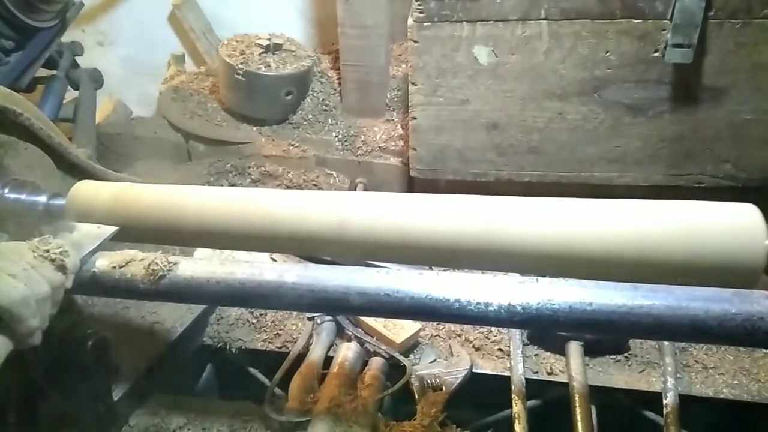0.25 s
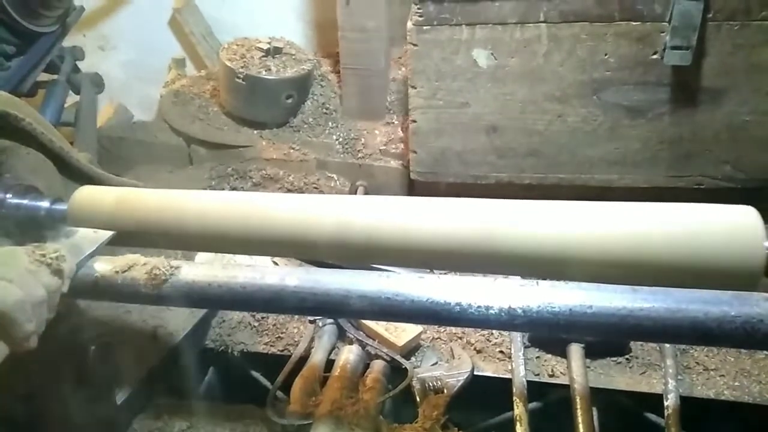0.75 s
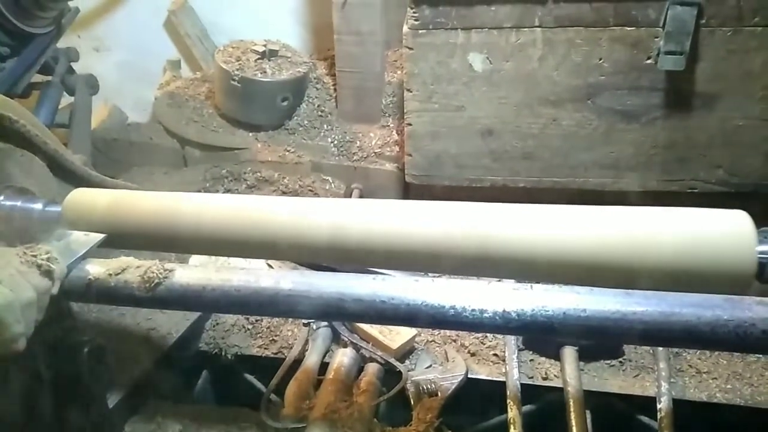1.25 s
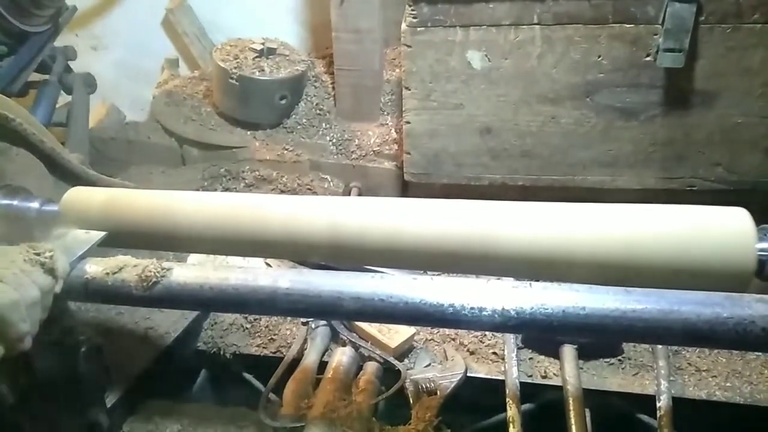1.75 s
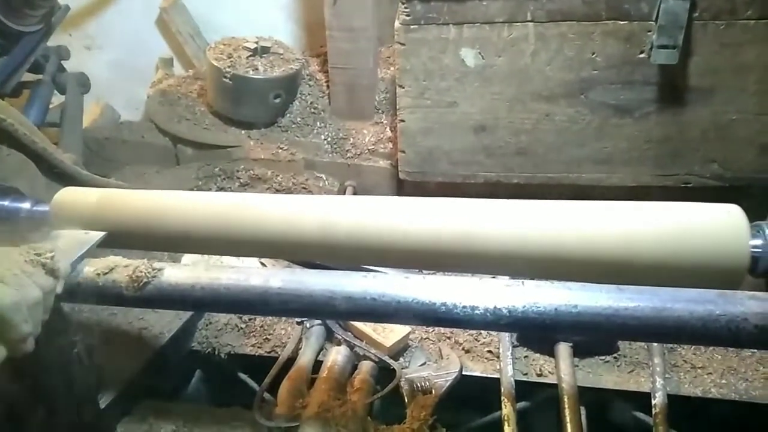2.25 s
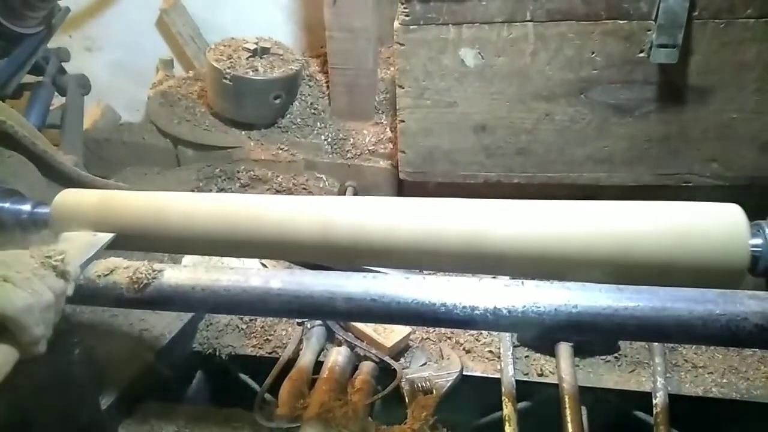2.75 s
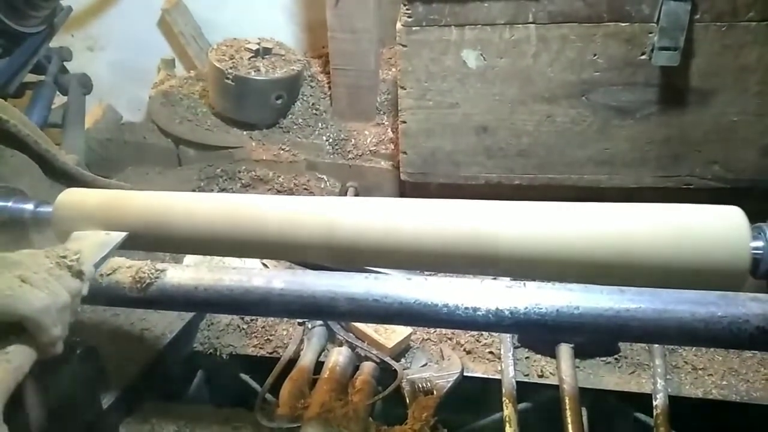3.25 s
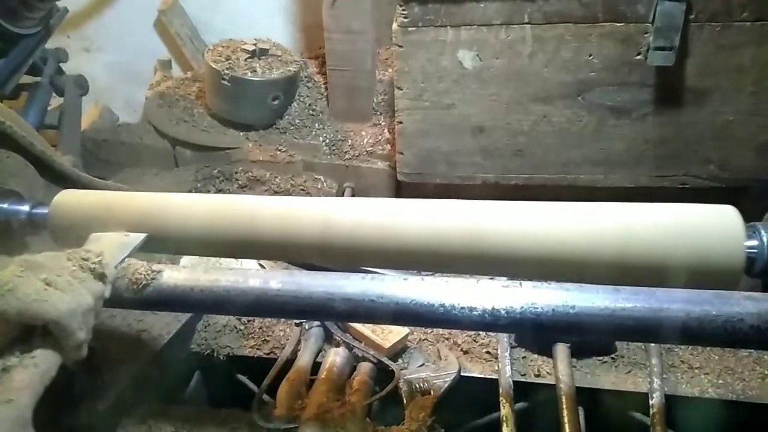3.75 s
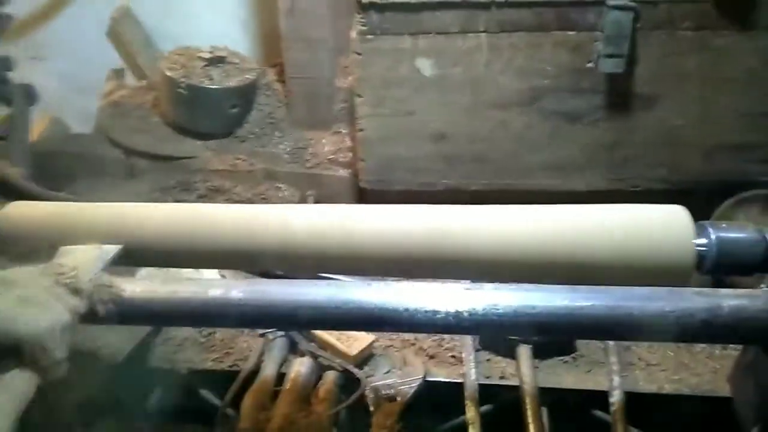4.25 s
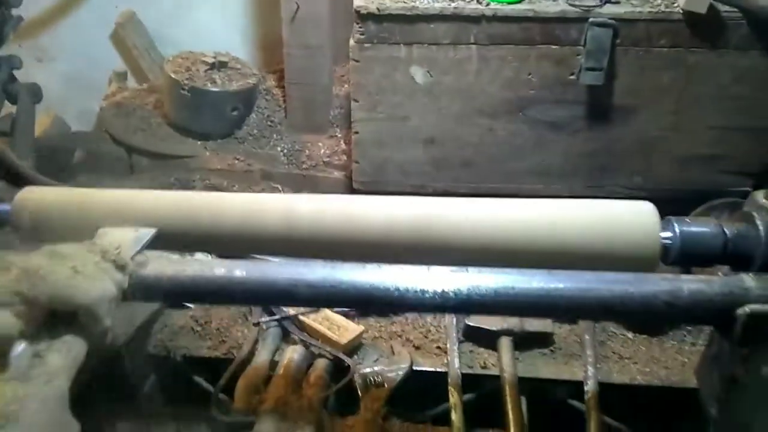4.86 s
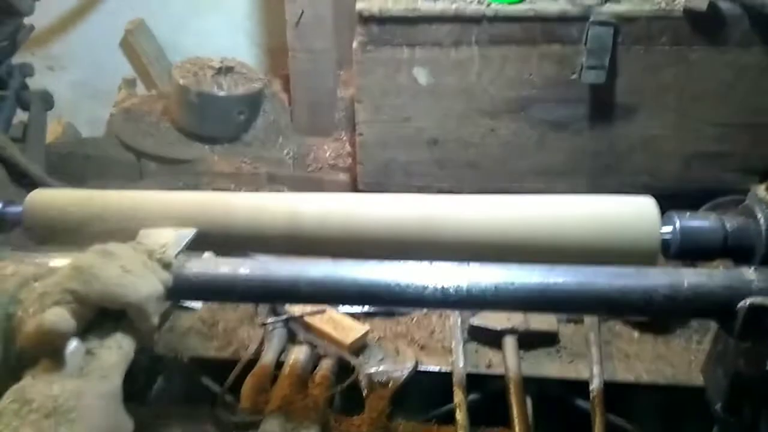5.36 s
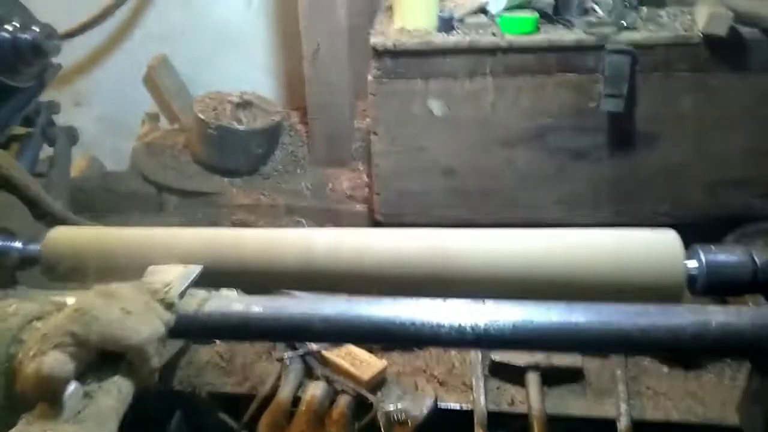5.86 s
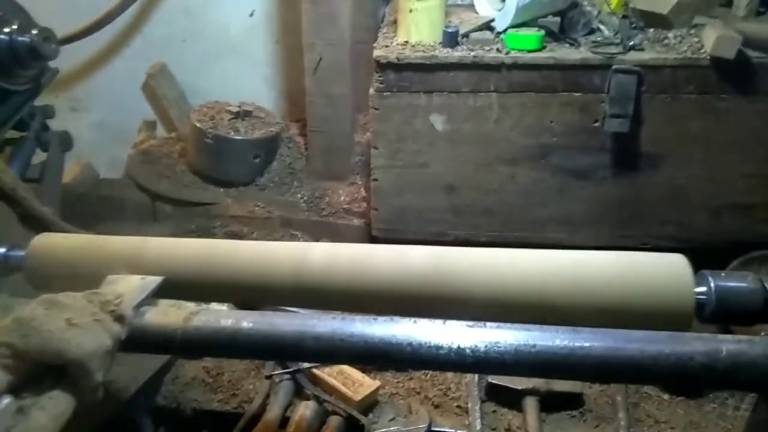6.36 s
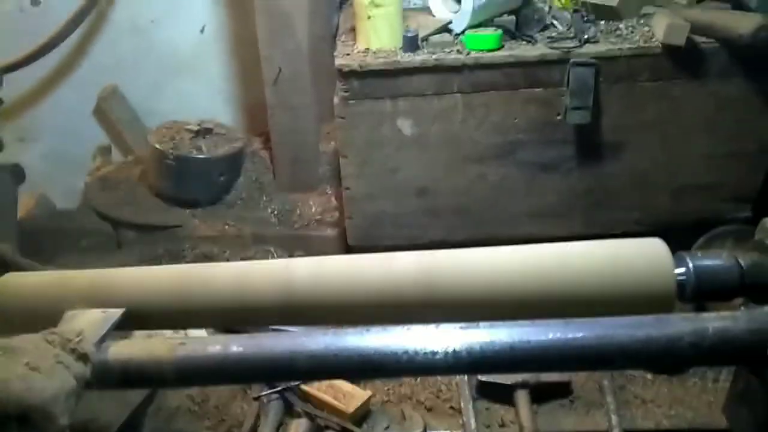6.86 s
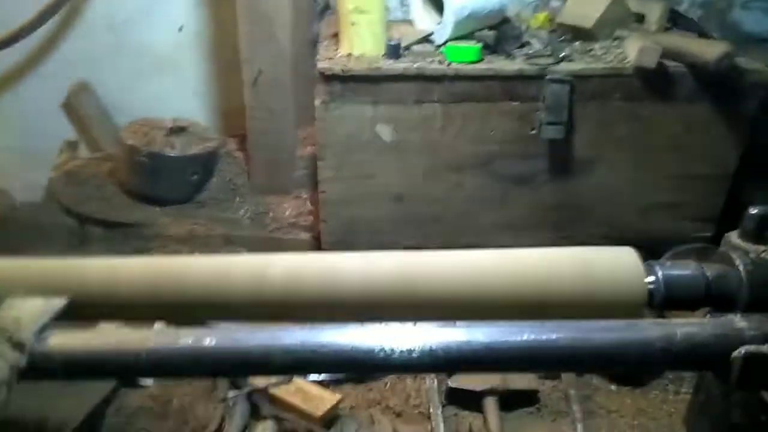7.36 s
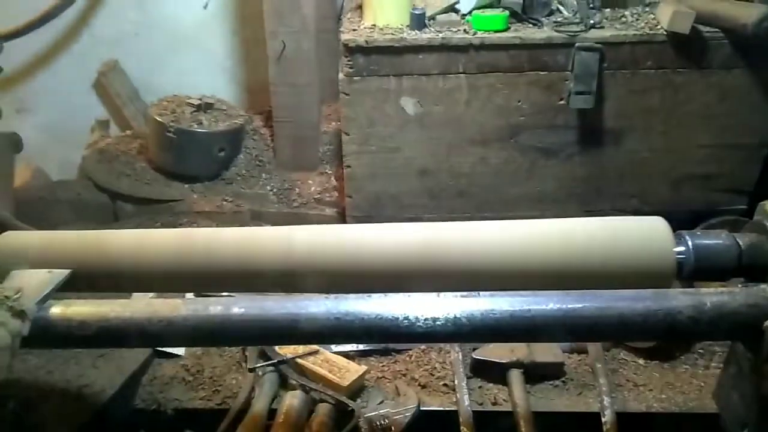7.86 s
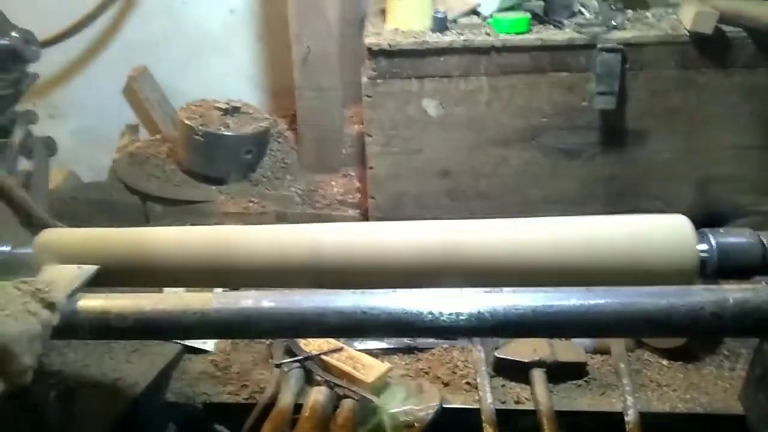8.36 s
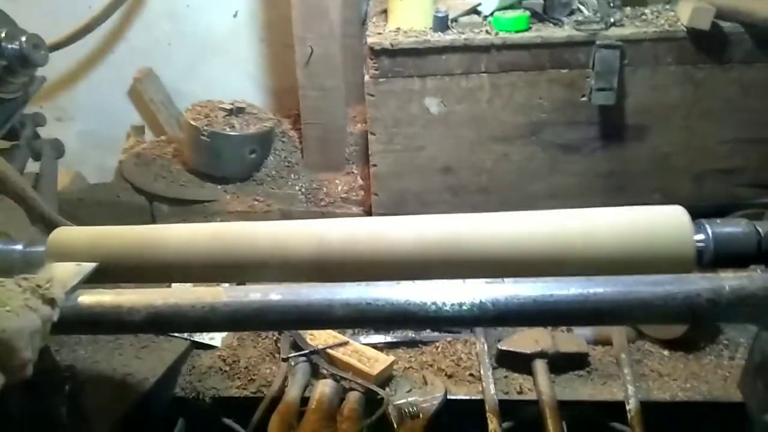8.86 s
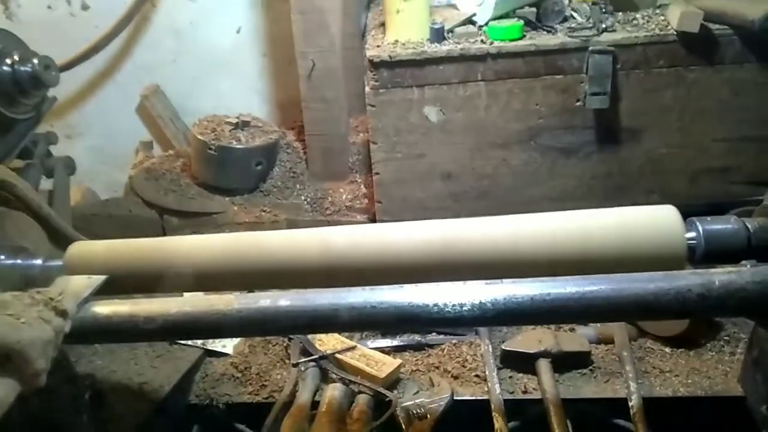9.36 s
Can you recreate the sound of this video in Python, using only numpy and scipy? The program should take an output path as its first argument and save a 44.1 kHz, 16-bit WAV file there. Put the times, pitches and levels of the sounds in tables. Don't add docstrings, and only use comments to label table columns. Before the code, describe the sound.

Close workshop scraping: a fast-turning wood cylinder rattles and rings against a cutting edge, with bright shaving hiss, thin squeals and low machine hum.

```python
import sys
import numpy as np
from scipy import signal
from scipy.io import wavfile
from scipy.ndimage import uniform_filter1d, map_coordinates

SR = 44100
rng = np.random.default_rng(int(sys.argv[2]) if len(sys.argv) > 2 else 0)


def how_loud(loudness_db):
    steps = np.asarray(loudness_db, float) / 20
    return 10 ** steps


def waveform_to_disk(signal):
    frames = np.transpose(np.atleast_2d(signal))
    scaled = np.clip(frames, -1, 1) * 32767
    samples = np.round(scaled).astype(np.int16)
    wavfile.write(sys.argv[1], SR, samples)


N = 423360
CONTROL_STEP = 40

# (frequency [Hz], width [Hz], level [dB])
REST_MODES = [(166.7, 4.9, -9), (186.6, 4.2, 0), (334.6, 52, -14.5), (452.3, 41.7, -1), (708.6, 8.3, -2.5),
              (931, 23.5, -1.5), (1076, 25, -4), (1206, 23, -1.5)]
# (frequency [Hz], density [dB per Hz])
REST_NOISE = [(15, -51), (25, -36), (76, -23.5), (172, -9), (277, -19.5), (456, -21), (562, -25),
              (707, -6.5), (1380, -7), (1700, -6), (2400, -10.5), (3120, -58), (5280, -120)]
# (frequency [Hz], width [Hz], level [dB])
MOTOR_LINES = [(718, 4, 0), (161, 5, -7), (900, 8, -9)]
# (time [s], frequency [Hz], level [dB])
HUM = [
    (6.3, 128, -93),
    (6.55, 128, -62.5),
    (7.3, 129, -60),
    (7.55, 129, -74),
]
# (middle [s], half length [s], peak [dB])
SHAKES = [
    (.06, 0.097, -57),
    (.65, 0.4, -64),
    (1.27, 0.16, -58),
    (1.63, .05, -58),
    (2.06, .04, -63),
    (5.9, 0.95, -67),
    (8.3, 0.54, -66),
]
# (time [s], peak [dB])
THUMPS = [
    (1.187, -37),
    (1.302, -37.5),
    (1.359, -60),
    (1.641, -39),
    (2.049, -40),
]
MOTOR_DB, REST_DB, SHAKE_REST_DB = -62, -56.5, -75
LEAN_DB = 10

# (time [s], depth of shaving [dB], lean on the rest [0-1], slackness of grip on the steel [dB])
HANDS = [(0, -3, 0.33, 1), (.65, 1, 0.3, 10), (1.1, 0.5, 0.18, 1), (1.45, 0, 0.1, -5), (1.95, -6, 0.1, 4),
         (2.25, -3, 0.42, 1), (2.55, 3, 0.48, 2), (2.95, 0.5, 0.64, 10), (3.4, 2, 0.59, 4.5),
         (4.5, -1.5, 0.76, 6.5), (5.25, 0, 0.88, 3), (5.6, -2.5, .8, 3.5), (6.3, 1.5, 0.94, -0.5),
         (6.75, -1, 0.64, -1), (7.85, 1, 0.78, -11), (8.35, -0.5, 0.68, -0.5), (8.7, -3.5, 0.18, -4.5),
         (9.6, -2, 0.09, -7)]
# (middle [s], half length [s], loss [dB])
EASES = [(0.284, 0.067, 2.5), (1.125, 0.019, 2.5), (1.482, 0.049, 4), (1.842, 0.024, 8), (3.665, 0.011, 7),
         (5.446, 0.04, 8), (5.717, 0.064, 2), (6.662, .02, 6.5), (6.772, 0.016, 7), (7.458, 0.014, 8),
         (7.534, 0.036, 8.5), (8.45, 0.042, 4), (8.735, 0.034, 9), (8.977, 0.065, 5.5), (9.22, 0.088, 5)]
TURNS_PER_S = 39.42
# (time [s], high spot angle [turns], knock share [0-1], surface memory [0-1], unevenness [dB])
CUT = [(0, -0.41, 0.8, 0.77, 1.5), (.6, -0.3, 0.94, 0.64, 1.5), (1.5, -.15, 1, 0.54, 2.5),
       (2.1, -0.07, 0.86, 0.86, 3), (2.4, -0.15, 0.85, 1, 3.5), (2.7, -0.17, 0.1, 0.73, 3.5),
       (3.1, -0.18, 0.92, 0.7, 3.5), (3.6, -0.4, 0.06, 0.38, 1), (4.8, -0.62, 0, 0.37, 1.5),
       (5.7, -0.29, 0.48, 0.13, 1), (6.5, -0.42, 0, 0.13, 2), (7.4, -0.65, 0.01, 0.37, 1.5),
       (7.8, -0.48, 1, 0.5, 3), (8.1, -0.7, 0.64, 0.8, 2), (8.4, -0.49, 0.95, 0.9, 3),
       (8.7, -0.73, 0.97, 0.2, 2), (9.0, -0.7, 0.99, 0.7, 2.5), (9.6, -0.9, 0.95, 0.7, 2.5)]
# (time [s], angle [turns])
KNOCK_ANGLE = [
    (0, -0.36),
    (1.0, -0.35),
    (1.9, -.39),
    (2.2, -.34),
    (2.5, -0.29),
    (3.4, -.33),
    (7.6, -0.84),
    (9.6, -0.98),
]

# (frequency [Hz], density [dB per Hz])
SHAVING = [(1500, 7), (1950, 2), (2200, -10), (2900, -2.5), (3500, 3), (4200, -1), (4900, -5), (5800, -3.5),
           (6400, 1), (7000, -1), (8000, 4), (9700, -4.5), (11000, 0.5), (12500, -22), (15000, 1.5)]
# (frequency [Hz], width [Hz], level [dB])
TOP = [(14600, 260, 8), (15300, 2900, -1)]
# (frequency [Hz], width [Hz], level [dB])
DRY_TOP = [(15060, 740, 0)]
# (middle [s], half length [s], peak [dB])
TOP_BOUTS = [
    (1.05, 0.16, -47),
    (2.62, 0.18, -40),
    (3.3, 0.36, -46),
    (7.68, 0.067, -41),
    (8.1, 0.31, -48),
    (9.45, .15, -57),
]
# (middle [s], half length [s], peak [dB])
STEEL_BOUTS = [(3.93, 0.14, -41), (4.35, 0.056, -59), (4.63, .03, -46), (4.74, 0.022, -44),
               (5.08, 0.066, -39.5), (5.32, 0.081, -43), (5.62, 0.065, -42.5), (5.87, 0.017, -40),
               (6.18, 0.056, -50), (6.7, 0.022, -47), (7.35, .05, -54), (7.59, 0.027, -47),
               (8.55, 0.053, -51), (8.83, 0.065, -50)]
# (middle [s], half length [s], frequency [Hz], width [Hz], level [dB])
SQUEAKS = [(.95, 0.68, 1480, 250, -55.5), (2.898, 0.55, 1440, 257, -51.5), (1.262, 0.27, 7800, 600, -54),
           (2.673, 0.35, 6980, 500, -50), (3.096, 0.19, 8700, 400, -43), (2.6, 0.27, 4970, 450, -53),
           (2.95, 0.22, 5270, 451, -49), (3.277, 0.2, 5430, 450, -49.5), (4.697, 1, 8000, 456, -56),
           (5.905, 1.7, 6320, 223, -54), (7.67, 0.15, 5440, 303, -51.5), (8.1, 0.089, 3700, 450, -55),
           (9.108, 0.27, 5640, 1110, -52), (9.22, 0.23, 7150, 800, -51)]
STEEL_HZ, STEEL_WIDTH_HZ = 11760, 30
HISS_DB, TOP_DB, STEEL_DB = -45.5, -52.5, -51
TOP_FOLLOWS = 0.88

# (frequency [Hz], width [Hz], level
# [dB])
BUILD_UP = [(1655, 230, 0)]
# (frequency [Hz], width [Hz], level [dB])
BENDING_SIDE = [(1495, 51, 14), (1577, 30, 10.5)]
# (middle [s], half length [s], peak [dB])
BENDING_BOUTS = [(.08, 0.3, -40.5), (.42, 0.11, -37.5), (.95, 0.32, -47), (1.47, 0.12, -43),
                 (1.95, 0.064, -36), (2.24, 0.13, -35), (3.1, 0.2, -44.5), (3.6, .2, -46),
                 (4.35, 0.12, -45.5), (5.3, 0.45, -47), (7.7, 0.17, -42.5), (8.07, 0.12, -38.5),
                 (8.32, 0.068, -42), (8.5, 0.19, -29), (9.18, 0.33, -30.5)]
# (time [s], contact mode [Hz], upper mode [Hz])
MOVING_MODES = [(0, 1815, 3376), (1.2, 1727, 3340), (1.65, 1840, 3400), (2.1, 1826, 3400),
                (2.5, 1828, 3555), (3.5, 1836, 3410), (4.0, 1860, 3340), (4.4, 1852, 3400),
                (4.7, 1883, 3400), (5.1, 1873, 3360), (5.5, 1860, 3450), (5.9, 1904, 3460),
                (7.0, 1900, 3338), (7.6, 1872, 3360), (8.3, 1880, 3460), (9.6, 1975, 3365)]
# (frequency [Hz], width [Hz], level [dB])
SIDE_MODE = [(1803.4, 61, 0)]
# (middle [s], half length [s], peak [dB])
CONTACT_BOUTS = [(.05, .12, -71), (.39, 0.062, -40.5), (1.3, 0.27, -44), (1.64, 0.071, -38.5),
                 (2.08, 0.28, -39), (3.75, 0.33, -37), (4.22, 0.12, -35.5), (4.55, 0.23, -36),
                 (4.82, 0.063, -31), (5.02, 0.072, -33.5), (5.24, 0.11, -38), (5.48, 0.11, -33),
                 (6.02, 0.21, -35.5), (6.45, 0.23, -32), (6.82, 0.044, -33.5), (7.04, 0.033, -50),
                 (7.3, .1, -45), (7.41, .04, -42), (8.36, 0.086, -39)]
# (middle [s], half length [s], peak [dB])
UPPER_BOUTS = [(.15, .13, -48), (1.5, 0.42, -44), (2.3, 0.23, -52), (4.88, 0.089, -46.5), (5.27, 0.11, -46),
               (5.95, 0.045, -44.5), (7.27, 0.19, -49.5), (8.17, 0.23, -44.5), (8.86, 0.052, -44),
               (9.35, 0.028, -49), (9.51, 0.025, -41), (9.58, 0.015, -46)]
# (frequency [Hz], width [Hz], level [dB])
REST_BAR = [(2489, 75, -3), (2534, 22, 1)]
# (frequency [Hz], width [Hz], level [dB])
CLUSTER = [(1260, 40, -20), (1430, 33, -2), (1860, 740, 14), (1926, 107, 22), (2320, 120, 0.5),
           (3340, 108, 8), (3700, 620, 9.5), (3910, 74, 4), (4270, 86, 10.5), (4440, 196, 6.5)]
# (middle [s], half length [s], peak [dB])
STROKE_BOUTS = [(.07, 0.067, -37), (.21, 0.038, -42), (.44, 0.12, -42), (.7, 0.04, -43.5), (.9, 0.17, -45),
                (1.3, 0.15, -41.5), (1.63, 0.078, -38.5), (1.8, 0.11, -42.5), (2.02, 0.08, -41),
                (2.2, 0.12, -47), (2.5, 0.17, -50), (8.15, 0.42, -51.5), (8.86, 0.093, -45)]
# (time [s], peak [dB])
SLIPS = [(3.4148, -32), (3.528, -39), (3.5749, -29), (3.6198, -36), (3.6757, -29), (3.7051, -24.5),
         (3.779, -34), (3.8663, -35), (3.9102, -32), (4.0033, -27), (4.0699, -39), (4.1142, -29),
         (4.159, -27.5), (4.1842, -32), (4.2594, -25), (4.3098, -37), (4.387, -33), (4.4105, -37),
         (4.4365, -23), (4.4649, -41), (4.5143, -33), (4.5432, -40), (4.5625, -32), (4.5999, -23),
         (4.657, -32), (4.7034, -34), (4.7684, -30), (4.873, -37), (4.9164, -28.5), (4.9723, -37),
         (4.9942, -32), (5.0935, -44), (5.1678, -30), (5.1928, -36), (5.2312, -28), (5.363, -31),
         (5.4003, -25), (5.4332, -31), (5.4746, -29), (5.9281, -26), (5.9795, -39), (6.1845, -31),
         (6.2863, -57), (6.308, -32), (6.3417, -26), (6.3945, -41), (6.4146, -27), (6.4389, -32),
         (6.5276, -25), (6.7158, -31), (6.9, -34), (7.0251, -30.5), (7.077, -32), (7.1857, -36),
         (7.2233, -26.5), (7.295, -34)]
# (time [s], peak [dB])
TICKS = [(0.018, -33), (0.0413, -39), (0.0667, -34), (0.0922, -30), (0.1181, -28), (0.2199, -26),
         (0.3716, -35), (0.3965, -30), (0.449, -32), (0.729, -30), (0.8011, -34), (0.8293, -35),
         (1.0056, -37), (1.053, -28), (1.0789, -23), (1.155, -37), (1.207, -42), (1.2336, -41),
         (1.259, -36), (1.2855, -35), (1.357, -28), (1.4855, -33), (1.5379, -39), (1.5643, -31),
         (1.5888, -38), (1.6152, -34), (1.6412, -38), (1.7135, -34), (1.7399, -35), (1.7669, -30),
         (1.7928, -32), (1.8687, -34), (1.8941, -30), (1.9198, -27), (1.9709, -36), (1.9964, -39),
         (2.0218, -24), (2.0477, -29), (2.0727, -34), (2.099, -33), (2.1485, -40), (2.1994, -34),
         (2.2248, -33), (2.3042, -33), (2.378, -35), (2.4299, -41), (2.4538, -38), (2.5301, -31),
         (2.6324, -34), (2.6833, -40)]
# (time [s], peak [dB])
LATE_TICKS = [(7.9522, -34), (8.0275, -26), (8.1004, -33), (8.1258, -34), (8.1543, -32), (8.2001, -37),
              (8.2256, -36), (8.3274, -35), (8.3528, -26), (8.7569, -37), (8.7808, -29), (8.8048, -28),
              (8.8317, -33), (8.8547, -27), (8.8811, -32), (8.9075, -33), (8.9579, -41), (8.9839, -35),
              (9.0098, -33), (9.0357, -34), (9.0607, -32), (9.1106, -40), (9.1625, -35), (9.2363, -40),
              (9.3121, -33), (9.3365, -27), (9.363, -33), (9.4867, -38), (9.5122, -39), (9.5645, -28)]
# (time [s], peak [dB])
CATCHES = [
    (6.64, -37),
    (6.727, -38),
    (7.3547, -40),
    (7.5755, -34.5),
]
# (frequency [Hz], level [dB], decay t60 [s])
CATCH_MODES = [(1693, -0.5, .06), (3400, -7.5, 0.073)]
BENDING_HZ, BENDING_WIDTH_HZ = 1675, 62
BENDING_REST_DB, CONTACT_REST_DB, UPPER_REST_DB, STROKE_REST_DB = -53.5, -46, -51.5, -60.5
STROKE_SHARPNESS = 1.2
SKID_S = 0.0087
SLIP_S, SLIP_DB, TICK_S, TICK_DB = 0.0034, -2.5, 0.0015, -6.5
RASP_HZ, LATE_RASP_HZ = [3280, 4660], [2920, 7650]
ROUNDING_HEIGHT = 0.08


def rms_one(x):
    return x / np.sqrt(np.mean(x ** 2) + 1e-20)


def in_time(rows):
    s, *columns = np.transpose(rows)
    return [np.interp(np.arange(N) / SR, s, c, left=c[0], right=c[-1]) for c in columns]


def fine(coarse):
    return np.interp(np.arange(N) / CONTROL_STEP, np.arange(len(coarse)), coarse)


def drift(rate_hz):
    r = np.exp(-2 * np.pi * rate_hz * CONTROL_STEP / SR)
    noise = rng.standard_normal(N // CONTROL_STEP + 2002)
    slow = signal.lfilter([1], [1, -2 * r, r * r], noise)[2000:]
    return fine(rms_one(slow))


def swell(middle, half):
    t = np.arange(0, N + CONTROL_STEP, CONTROL_STEP) / SR
    return np.exp(-np.abs((t - middle) / half) ** 3)


def bouts(rows, rest_db):
    power = sum(how_loud(db) ** 2 * swell(s, half) for s, half, db in rows)
    return 10 * np.log10(how_loud(rest_db) ** 2 + fine(power))


def easing():
    return fine(sum(-db * swell(s, half) for s, half, db in EASES))


def swells(rows, carrier, rise_s):
    out, t = np.zeros(N + 3000), np.arange(3000) / SR
    shape = t / rise_s * np.exp(1 - t / rise_s)
    for s, db in rows:
        out[round(s * SR):][:len(t)] += how_loud(db) * shape
    return out[:N] * carrier


def tone(hz):
    return np.sin(2 * np.pi * np.cumsum(hz) / SR)


def band_pass(x, order, band_hz):
    return signal.sosfilt(signal.butter(order, band_hz, "band", fs=SR, output="sos"), x)


def rasp(band_hz):
    return rms_one(band_pass(rng.standard_normal(N), 3, band_hz))


def modes(x, table):
    out = 0
    for k, (hz, width, db) in enumerate(table):
        r = np.exp(-np.pi * width / SR)
        gain = (-1) ** k * how_loud(db) * (1 - r * r) / 2
        poles = [1, -2 * r * np.cos(2 * np.pi * hz / SR), r * r]
        out = out + signal.lfilter([gain, 0, -gain], poles, x)
    return rms_one(out)


def moving_mode(x, hz, width_hz, steady=0):
    carrier = np.exp(2j * np.pi * np.cumsum(hz) / SR)
    r = np.exp(-np.pi * width_hz / SR)
    ring = signal.lfilter([1], [1, -2 * r, r * r], x / carrier)
    if steady:
        power = uniform_filter1d(np.abs(ring) ** 2, size=1300)
        ring = ring / (power + 1e-9) ** (steady / 2)
    return rms_one((ring * carrier).real)


def coloured(x, spectrum, patchy_db):
    hz, db = np.transpose(spectrum)
    edges = np.geomspace(hz[0], min(hz[-1] * 1.1, 16500), 25)
    out = 0
    for k, (low, high) in enumerate(zip(edges, edges[1:])):
        level_db = np.interp(np.log(low * high) / 2, np.log(hz), db) + patchy_db * drift(2.7)
        out = out + (-1) ** k * how_loud(level_db) * band_pass(x, 2, [low, high])
    return rms_one(out)


def bed():
    shake = rng.standard_normal((4, N))
    lean = in_time(HANDS)[1]
    drone = 0.55 * how_loud(7 * (lean - 0.7)) * modes(shake[0], REST_MODES)
    drone += 0.81 * coloured(shake[1], REST_NOISE, patchy_db=1.8)
    rest_db = REST_DB + LEAN_DB * lean + 0.51 * easing()
    out = how_loud(rest_db + 3.5 + 1.35 * drift(10.2)) * drone
    hum_hz, hum_db = in_time(HUM)
    out += how_loud(hum_db) * np.sqrt(2) * tone(hum_hz)
    out += how_loud(MOTOR_DB) * modes(shake[3], MOTOR_LINES)
    rumble = rms_one(band_pass(shake[2], 2, [12, 60]))
    return out + how_loud(bouts(SHAKES, SHAKE_REST_DB) - 5.5) * rumble


def thumps():
    out, t = np.zeros(N), np.arange(2000) / SR
    push = t / 0.00097 * np.exp(-t / 0.00029) * (1 - t / 0.00062)
    for s, db in THUMPS:
        out[round(s * SR):][:len(t)] += how_loud(db + 29.0) * push
    return how_loud(1.5) * signal.lfilter(*signal.butter(1, 450, fs=SR), out)


def contact():
    high_spot, knock_share, memory, uneven_db = in_time(CUT)
    turns = TURNS_PER_S * np.arange(N) / SR - high_spot
    size = round(SR / TURNS_PER_S)

    surface = rng.standard_normal((int(turns[-1]) + 2, size))
    turn_start = np.searchsorted(turns, np.arange(len(surface))).clip(0, N - 1)
    kept = np.clip(memory[turn_start], 0, 0.97)
    for k in range(1, len(surface)):
        surface[k] = kept[k] * surface[k - 1] + np.sqrt(1 - kept[k] ** 2) * surface[k]
    ridges = map_coordinates(surface.ravel(), [turns * size], order=3)
    heel_ridges = map_coordinates(surface[:, ::-1].ravel(), [turns * size], order=3)

    wave = np.cos(2 * np.pi * turns) + 0.43 * np.cos(4 * np.pi * turns + 0.65)
    pressure = how_loud(uneven_db * wave + 1.02 * drift(35))
    pressure = pressure / np.sqrt(uniform_filter1d(pressure ** 2, size=4 * size))

    place = (turns + high_spot - in_time(KNOCK_ANGLE)[0]) * size
    whole = np.floor(place / size)
    at = np.flatnonzero(np.diff(whole) > 0) + 1
    late = np.clip(place[at] - whole[at] * size, 0, 1)
    strength = np.sqrt(size) * how_loud(0.5 * rng.standard_normal(len(at)))
    knocks = np.zeros(N)
    knocks[at], knocks[at - 1] = strength * (1 - late), strength * late

    share = np.clip(knock_share, 0, 1)
    tearing = pressure * rng.standard_normal(N) * how_loud(2.0 * drift(23))
    force = np.sqrt(share) * knocks + np.sqrt(1 - share) * tearing
    scrape = pressure * ridges + 0.28 * np.sqrt(share) * knocks
    heel = pressure ** 0.44 * heel_ridges
    return force, scrape, heel, pressure


def squeaks(edge):
    out = np.zeros(N)
    for s, half, hz, width, db in SQUEAKS:
        near = np.arange(max(0, int((s - 2 * half) * SR)), min(N, int((s + 2 * half) * SR)))
        rise = np.exp(-((near / SR - s) / half) ** 2)
        out[near] += how_loud(db) * rise * moving_mode(edge[near], np.full(len(near), hz), width_hz=width)
    return out


def blade(scrape, heel, pressure):
    depth_db, _, slack_db = in_time(HANDS)
    ease_db, tremor = easing(), drift(4.1)
    hiss_db = HISS_DB + depth_db + 0.7 * ease_db + 0.7 * tremor
    top_db = TOP_DB + TOP_FOLLOWS * depth_db + 0.29 * ease_db + 2.1 * tremor
    dry_db = bouts(TOP_BOUTS, -70) + 0.8 * ease_db
    steel_db = bouts(STEEL_BOUTS, STEEL_DB + slack_db) + 0.38 * ease_db + 0.7 * drift(13.0)
    out = how_loud(hiss_db + 2.5) * coloured(scrape, SHAVING, patchy_db=2.73)
    out += how_loud(top_db + 6.5) * modes(heel * pressure ** 0.69, TOP)
    out += how_loud(dry_db + 2.5) * modes(modes(heel * pressure ** 0.9, DRY_TOP), DRY_TOP)
    rubbing = 0.43 * heel + rng.standard_normal(N)
    out += how_loud(steel_db + 1.5) * modes(rubbing, [(STEEL_HZ, STEEL_WIDTH_HZ, 0)])
    return out + squeaks(heel * pressure ** 1.1)


def catches():
    hits, out = np.zeros(N) + 1e-18, np.zeros(N)
    for s, db in CATCHES:
        hits[round(s * SR)] = how_loud(db + 9.5)
    for hz, db, t60 in CATCH_MODES:
        r, w = how_loud(-60 / (t60 * SR)), 2 * np.pi * hz / SR
        out += signal.lfilter([0, how_loud(db) * np.sin(w)], [1, -2 * r * np.cos(w), r * r], hits)
    return out


def blank(force, scrape, pressure):
    ease_db = easing()
    bending_db = bouts(BENDING_BOUTS, BENDING_REST_DB) + 0.22 * ease_db + 2.9 * drift(1.1)
    contact_db = bouts(CONTACT_BOUTS, CONTACT_REST_DB) + 0.64 * ease_db + 1.0 * drift(1.8)
    upper_db = bouts(UPPER_BOUTS, UPPER_REST_DB) + 0.84 * ease_db + 1.6 * drift(17.0)
    stroke_db = bouts(STROKE_BOUTS, STROKE_REST_DB)
    contact_hz, upper_hz = in_time(MOVING_MODES)

    bent = modes(force, [(BENDING_HZ, 190, 0)])
    bending = moving_mode(bent, np.full(N, BENDING_HZ), BENDING_WIDTH_HZ, steady=0.49)
    out = how_loud(bending_db - 4.0) * bending
    side_db = bending_db - 11.5 - 5.5 * fine(swell(8.5, 0.15))
    out += how_loud(side_db) * modes(modes(force, BUILD_UP), BENDING_SIDE)

    wandering_hz = contact_hz + 12 * drift(0.88)
    out += how_loud(contact_db - 6.0) * moving_mode(force, wandering_hz, width_hz=48.6, steady=0.47)
    side_db = contact_db - 9.0 - 6.9 * fine(swell(6.34, 0.67))
    out += how_loud(side_db) * modes(modes(force, SIDE_MODE), SIDE_MODE)

    mixed = 0.4 * force + 1.2 * scrape
    out += how_loud(upper_db - 3.0) * moving_mode(mixed, upper_hz, width_hz=190)
    out += how_loud(0.55 * upper_db - 28.0) * modes(mixed, REST_BAR)

    skid = rng.standard_normal(400) * np.exp(-np.arange(400) / SR / SKID_S)
    skidding = rms_one(signal.oaconvolve(force, skid)[:N])
    stroke = (0.57 * skidding + 0.81 * scrape) * pressure ** STROKE_SHARPNESS
    out += how_loud(stroke_db + 2.0) * modes(stroke, CLUSTER)
    out += how_loud(stroke_db - 10) * rms_one(rasp(RASP_HZ) * pressure ** 3.0)

    out += how_loud(SLIP_DB) * swells(SLIPS, tone(contact_hz + 15 * drift(22)), SLIP_S)
    out += how_loud(TICK_DB) * swells(TICKS, tone(upper_hz + 60 * drift(23.7)), TICK_S)
    out += how_loud(TICK_DB - 1.5) * swells(TICKS, rasp(RASP_HZ), 0.87 * TICK_S)
    out += how_loud(TICK_DB - 5.0) * swells(LATE_TICKS, rasp(LATE_RASP_HZ), 0.79 * TICK_S)
    return out + catches()


def scene():
    force, scrape, heel, pressure = contact()
    mix = bed() + thumps() + blade(scrape, heel, pressure)
    mix += blank(force, heel, pressure)
    return mix[None]


def low_pass(x):
    return signal.sosfilt(signal.butter(12, 16820, fs=SR, output="sos"), x)


def record(dry):
    rounded = ROUNDING_HEIGHT * np.tanh(dry / ROUNDING_HEIGHT)
    step = signal.sosfilt(signal.ellip(9, 0.5, 32, 15470, fs=SR, output="sos"), rounded)
    cut = signal.sosfilt(signal.ellip(10, 0.5, 60, 15800, fs=SR, output="sos"), step)
    return low_pass(cut)


dry = scene()
out = record(dry)
waveform_to_disk(out)
```